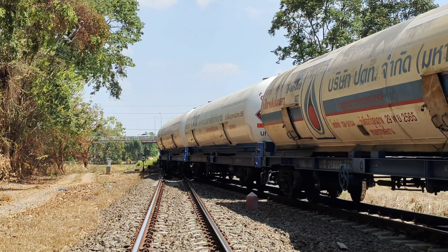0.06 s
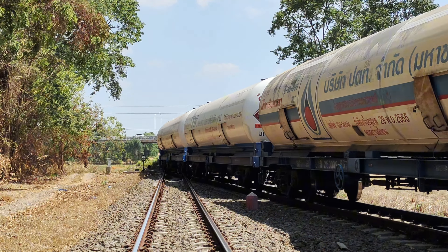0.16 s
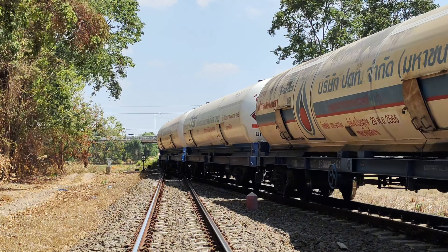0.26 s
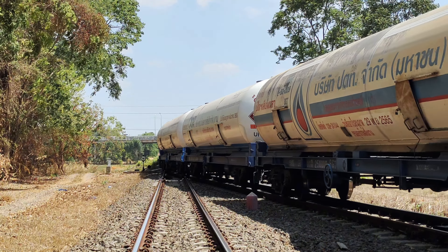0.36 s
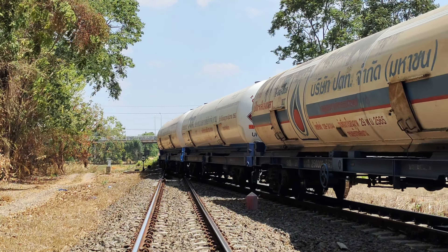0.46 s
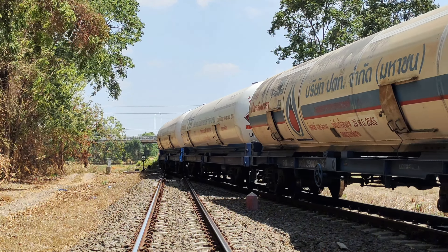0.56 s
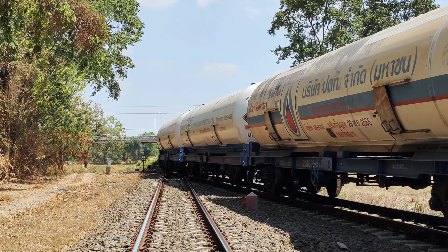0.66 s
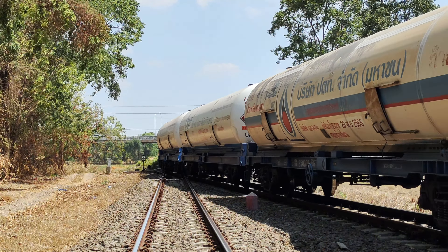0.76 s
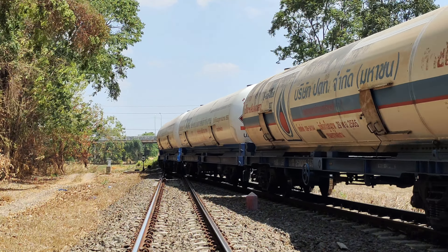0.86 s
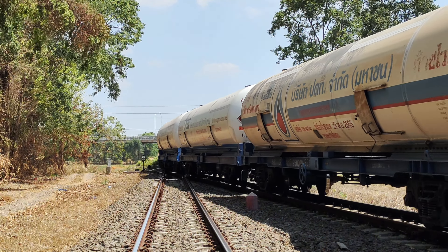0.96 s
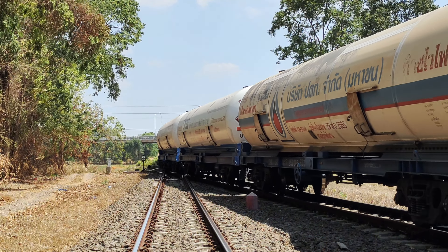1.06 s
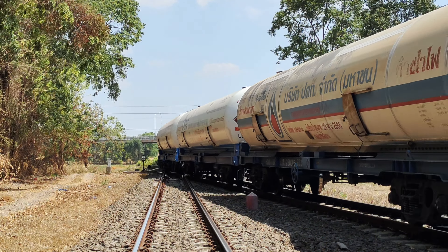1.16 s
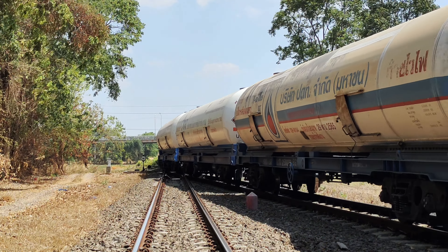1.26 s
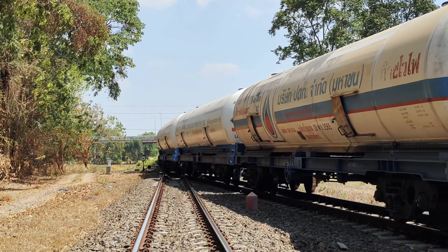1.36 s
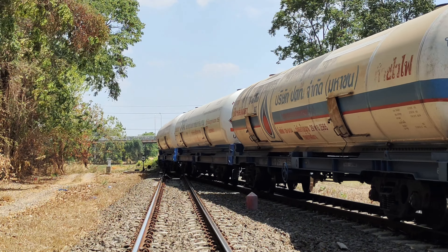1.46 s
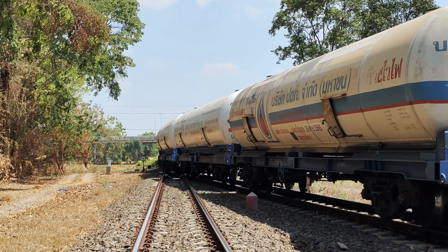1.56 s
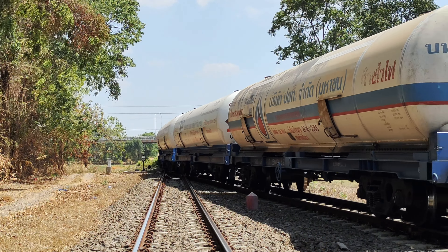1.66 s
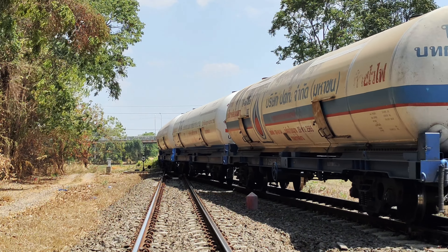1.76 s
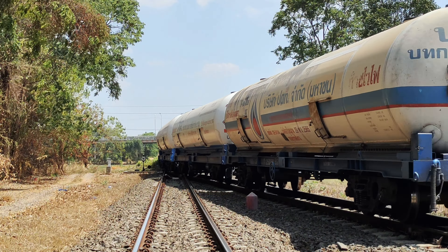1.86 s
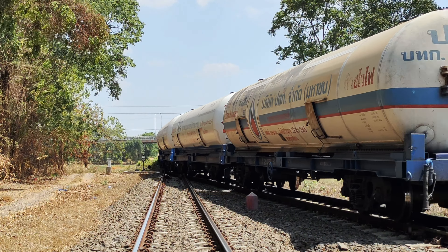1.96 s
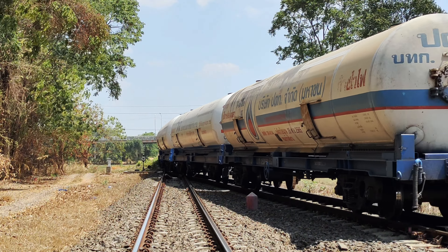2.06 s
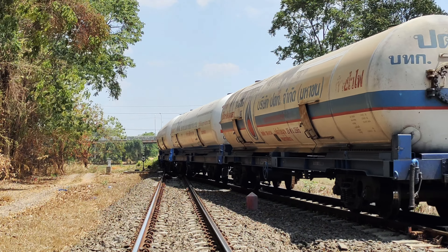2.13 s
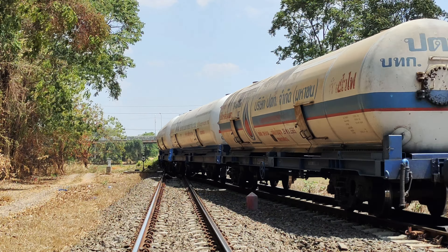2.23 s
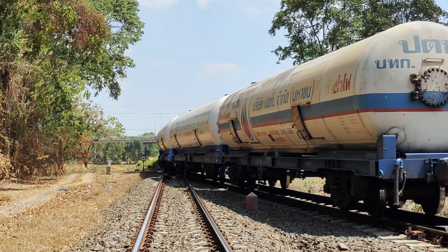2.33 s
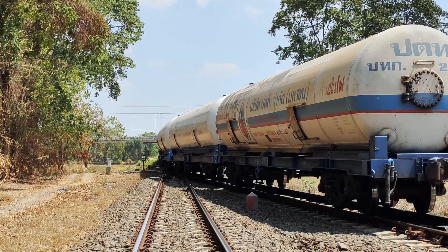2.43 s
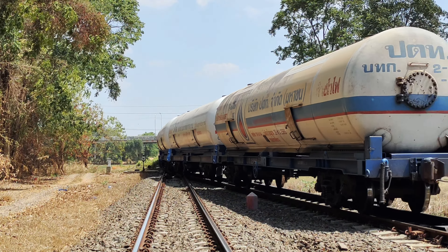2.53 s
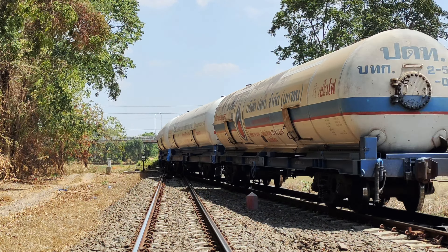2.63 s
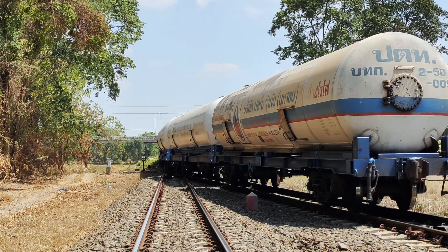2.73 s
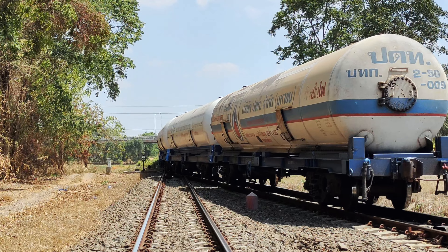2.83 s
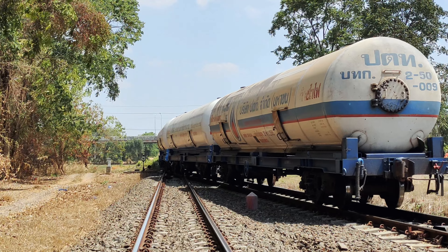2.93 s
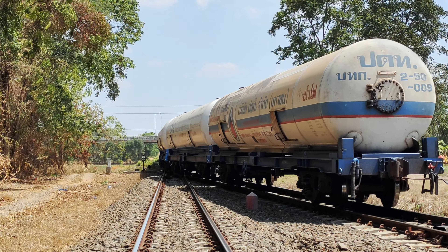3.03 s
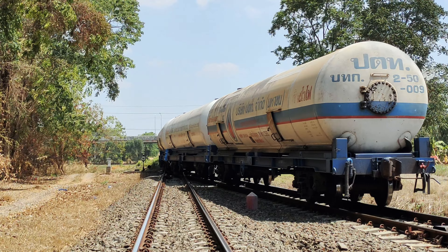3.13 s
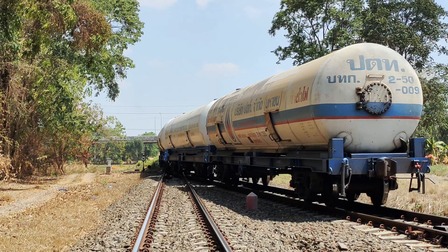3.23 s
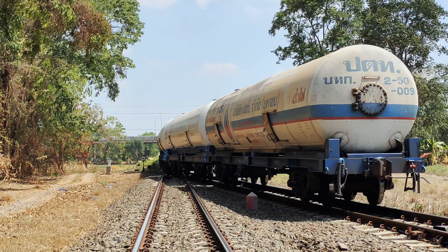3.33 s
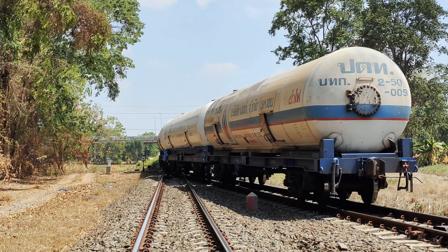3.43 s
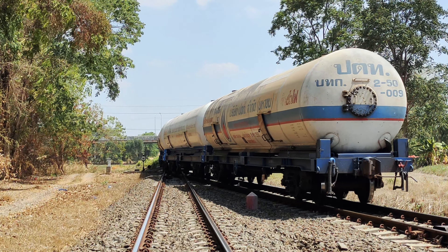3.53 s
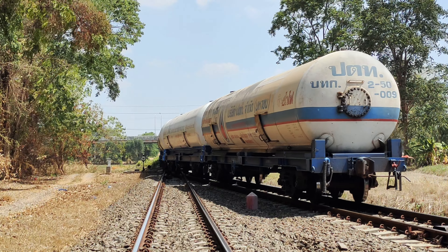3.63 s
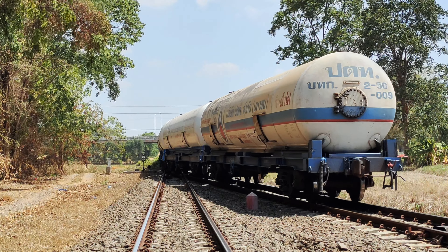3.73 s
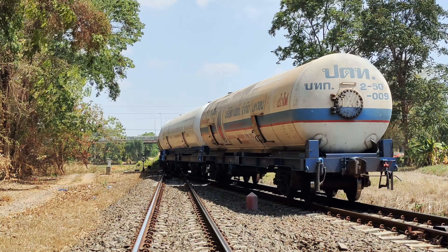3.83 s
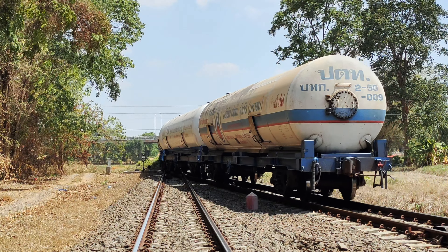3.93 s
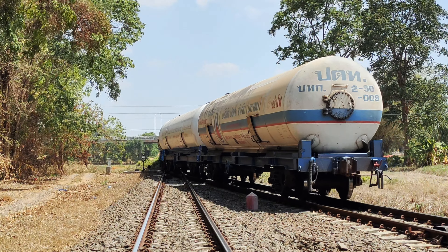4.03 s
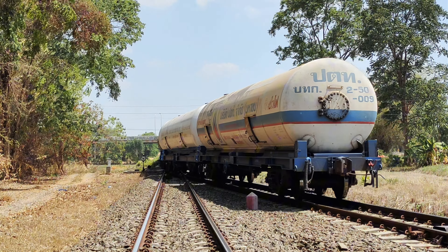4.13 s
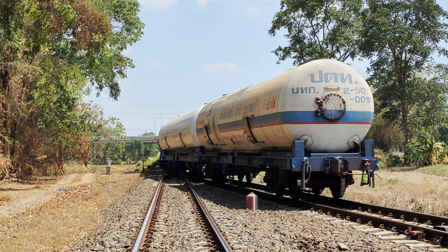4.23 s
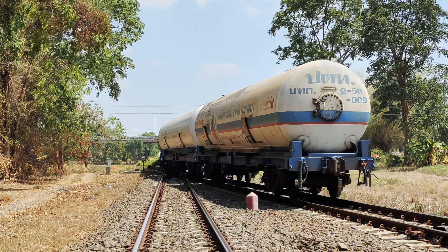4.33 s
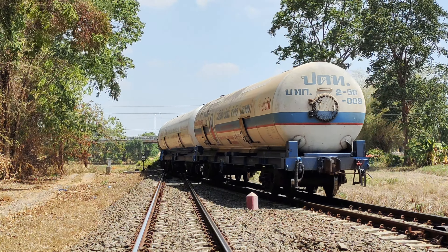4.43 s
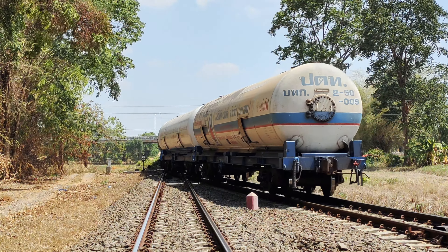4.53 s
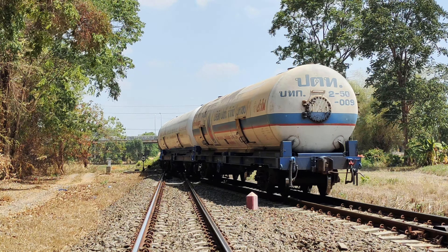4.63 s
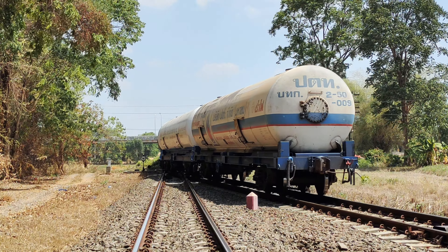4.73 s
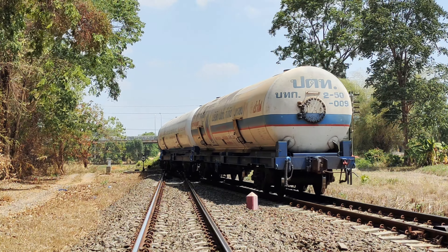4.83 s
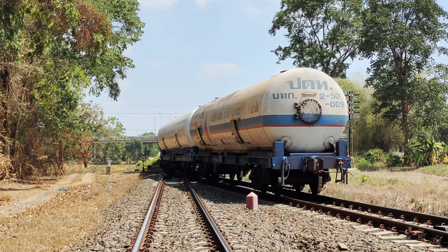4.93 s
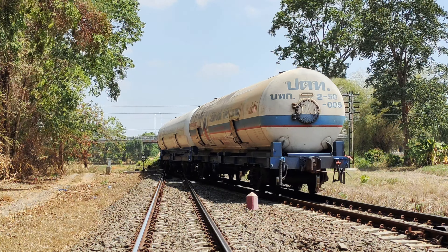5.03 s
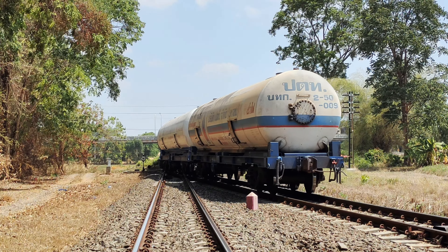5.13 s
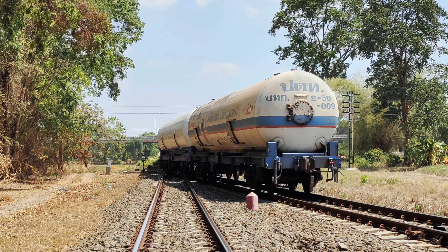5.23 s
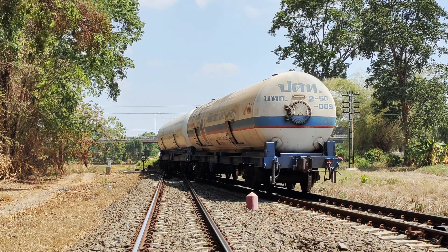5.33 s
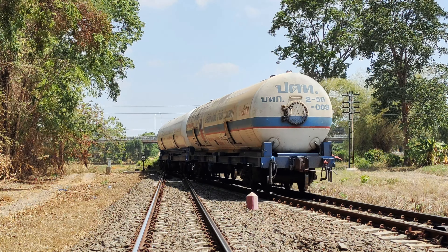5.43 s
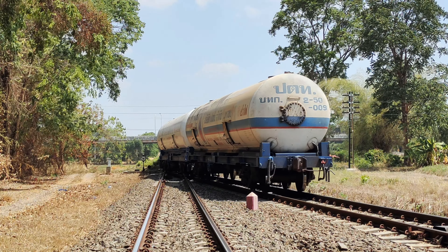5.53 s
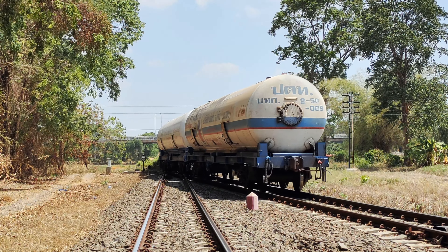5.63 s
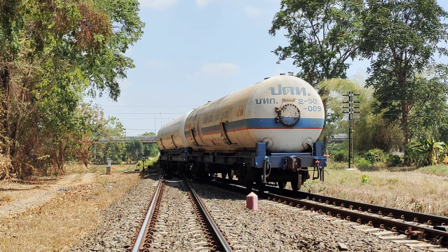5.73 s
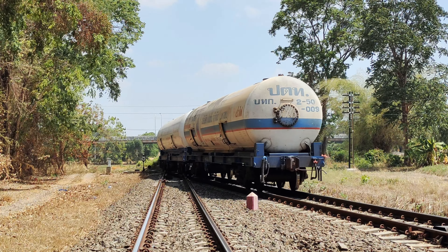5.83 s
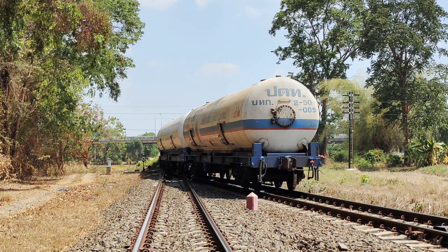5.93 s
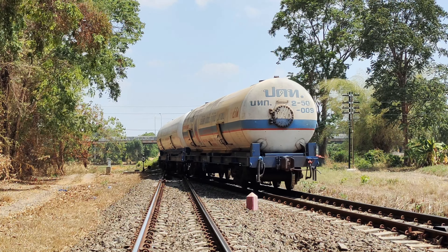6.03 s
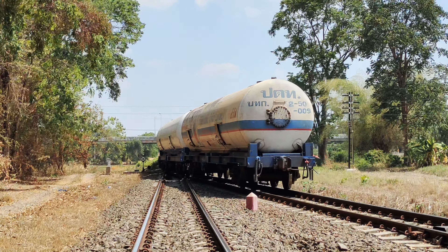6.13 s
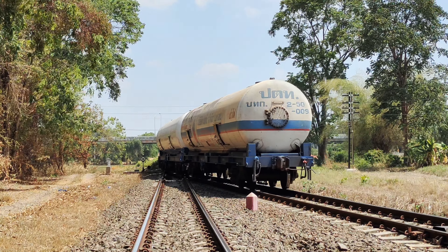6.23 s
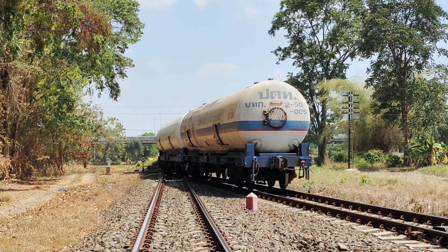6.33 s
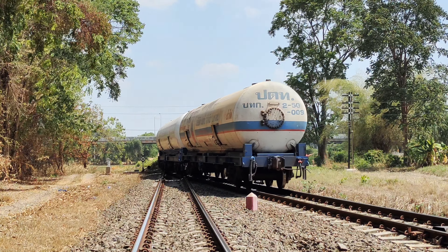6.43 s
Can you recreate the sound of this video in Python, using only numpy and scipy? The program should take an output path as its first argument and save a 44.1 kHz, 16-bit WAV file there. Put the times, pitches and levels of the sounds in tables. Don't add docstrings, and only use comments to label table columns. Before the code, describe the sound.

A slow freight train of tank wagons rolls away round a curve in an open yard. Shrill flange squeals ring at once over low rumble, in short wavering bursts with a raspy metal scrape. Between one and three seconds frames groan, axles clatter and couplings bump. The squeal thins, leaving hum and faint hiss, then bites again as wind puffs hit the nearby stereo microphone.

```python
import sys
import numpy as np
from scipy import signal
from scipy.io import wavfile
from scipy.ndimage import uniform_filter1d

SR = 44100
rng = np.random.default_rng(int(sys.argv[2]) if len(sys.argv) > 2 else 0)


def dump_mix(stems):
    frames = np.atleast_2d(stems).T
    limited = np.clip(frames, -1, 1)
    pcm = np.round(limited * 32767).astype(np.int16)
    wavfile.write(sys.argv[1], SR, pcm)


def field_ratio(decibels):
    return 10 ** (np.asarray(decibels, dtype=float) / 20)


N = 285768

# frequency in Hz, likeness from 0 to 1.
LIKENESS = [(60, 0.66), (130, 0.6), (290, 0.82), (640, 0.62), (1400, 0.3), (3060, 0.6), (6730, 0.15),
            (14800, 0.1)]
# frequency in Hz, left over right in dB.
TILT = [(60, 0), (110, 0), (200, 0.5), (380, -1), (690, -1), (1280, -2.5), (2360, 1), (4350, -3.5),
        (8020, 8.5), (14800, 8)]
SIDES = np.array([[.5], [-.5]])

# frequency in Hz, level in dB per Hz.
AIR_COLOUR = [(7000, -3), (8200, -5), (9600, -13), (11200, -12), (12300, -11), (13500, -11.5), (15500, -5)]
AIR_DB = -49
DUCKING = .5
# time in seconds, peak in dB, frequency in Hz, left over right in dB.
PUFFS = [(5.676, -18, 169, 25), (5.719, -21, 129.3, 26), (5.768, -17.5, 111.2, 24),
         (5.944, -15.5, 179.8, 28), (5.945, -18, 90.6, -26), (6.062, -22, 108.3, -11),
         (6.119, -16.5, 118.2, 22), (6.137, -13.5, 129.4, -30), (6.153, -14.5, 139, 19),
         (6.161, -17, 130.3, -30), (6.197, -22, 131, 24), (6.221, -22, 150.2, -26),
         (6.243, -26, 139.2, -14), (6.389, -14, 179.8, 7), (6.471, -23, 144, 15)]
# time in seconds, peak in dB, frequency in Hz.
BUMPS = [
    (0.7, -29, 83.6),
    (0.948, -29, 198),
    (1.32, -25, 67.97),
    (1.391, -22, 93.3),
    (1.758, -28, 68),
    (3.43, -17, 123),
]

# frequency in Hz, level in dB per Hz.
RUMBLE_COLOUR = [(12, -49), (20, -5.5), (40, -2), (92, 3.5), (108, -6.5), (150, -4.5), (225, -6.5),
                 (313, -28.5), (340, -12), (440, -30.5), (750, -120)]
# frequency in Hz, level in dB per Hz.
CLATTER_COLOUR = [(160, -36), (280, 4.5), (331, -11), (417, 0.5), (525, -1.5), (678, -7), (854, -6),
                  (1320, -18.5), (3000, -10), (3280, -4.5), (4300, -36), (5210, -9), (6000, -24),
                  (7800, -56), (13200, -120)]
# levels in dB of rumble, groan and clatter.
ROLL_DB = [-33.5, -38.5, -43.5]
# dB per second of rumble, groan and clatter.
RECEDE_DB_PER_S = [0.6, 0.75, 0.6951]
# start in seconds, end in seconds, extra dB of rumble, of groan and of clatter.
JOLTS = [
    (1.02, 1.12, -2, -2.5, 2.5),
    (1.3, 1.66, -3, 7.5, 1.5),
    (1.7, 1.8, 6.5, 13, 9.5),
    (1.82, 1.92, 6, 10, 11),
    (2.02, 2.1, 5.5, 11.5, 11),
    (2.15, 2.7, 1.5, 6, 1.5),
    (3.44, 3.48, 5, -2, -10),
]
JOLT_RISE_DB_PER_S, JOLT_FALL_DB_PER_S = 247, 155
# time in seconds, frequency in Hz.
GROAN_PITCH = [(0, 464.2), (1.2, 482.8), (1.32, 400), (1.55, 426.5), (1.72, 550), (1.8, 521.8), (1.87, 430),
               (2.03, 550), (2.15, 463.3), (4.1, 471.8), (5.3, 426.8), (6.48, 455)]

# frequency in Hz, width in Hz.
TANK_MODES = [(99.3, 27.2), (43.7, 19)]
# start in seconds, end in seconds, level in dB, left over right in dB.
TANK_HUMS = [
    [(2.3, 3.4, -38.5, -1), (3.4, 6.2, -34.5, -1.2)],
    [(1.4, 2.1, -45, 0), (2.9, 6.3, -40, 0)],
]
# frequency in Hz, width in Hz.
LOW_MODES = [(1362, 8), (2000, 90), (2358, 34), (2620, 90), (2890, 90), (3315, 60), (3735, 80), (3990, 40),
             (4130, 50), (4335, 55), (4712, 55)]
# start in seconds, end in seconds, level in dB, left over right in dB.
LOW_SQUEALS = [
    [(5.05, 5.4, -52.5, -5), (5.7, 5.95, -61, 1), (5.98, 6.8, -52, 7), (6.07, 6.3, -48, 8)],
    [(2.5, 5.3, -53.5, 0.5), (5.35, 5.5, -53, -3)],
    [(-.1, .6, -46, -5), (.5, .9, -45, 5), (.8, 1.25, -45, 3), (5.7, 6.8, -44.5, 0)],
    [(5.74, 6.05, -44.5, -1), (6.0, 6.32, -42, 2)],
    [(2.55, 2.8, -43, -6), (2.94, 3.08, -39, -2), (3.26, 3.36, -41, -8), (3.45, 3.62, -46, -4),
     (4.2, 4.36, -46, -5), (5.38, 5.56, -45, 1)],
    [(-.1, .2, -29.5, -7), (.4, .72, -34, 7), (.79, .9, -32.5, 12), (1.63, 1.76, -26.5, 3),
     (2.54, 3.0, -31, -9), (3.08, 3.38, -35, -6), (4.08, 4.2, -35, 9)],
    [(5.76, 6.1, -43.5, 0), (6.12, 6.24, -29, 4), (6.2, 6.33, -35.5, 4)],
    [(5.2, 5.5, -42, 9), (5.45, 5.75, -50, 7)],
    [(4.95, 5.2, -51, 3), (5.12, 5.5, -46, 7)],
    [(3.53, 3.68, -47, -3), (3.71, 3.8, -50, -3), (4.39, 4.63, -40.5, 9), (5.6, 5.72, -55, -3),
     (5.74, 5.98, -36.5, 1)],
    [(3.94, 4.15, -56, -2), (4.08, 4.42, -45.5, -8), (6.3, 6.6, -53, -14)],
]
# frequency in Hz, width in Hz.
FAINT_MODES = [(3800, 90), (3020, 73), (2070, 60)]
# start in seconds, end in seconds, level in dB, left over right in dB.
FAINT_SQUEALS = [
    [(-.1, .5, -38, 0.0078), (.55, .72, -43, 0), (.87, 1.15, -41, 0), (1.72, 1.9, -41.5, 0.0071),
     (2.58, 2.9, -47, 0.0085), (3.82, 4.05, -47, 0.0038), (6.1, 6.34, -37, 0.00083)],
    [(-.1, .2, -40, 0), (.25, .5, -48, 0.0081), (.97, 1.15, -40, 0), (1.18, 1.52, -36.5, 0),
     (6.25, 6.4, -47, 0)],
    [(5.576, 5.8, -59, 0.0033)],
]
# frequency in Hz, width in Hz.
HIGH_MODES = [(6470, 40), (6600, 60), (6748, 20), (7190, 80), (7460, 130), (10850, 80)]
# start in seconds, end in seconds, level in dB, left over right in dB.
HIGH_SQUEALS = [
    [(-0.04, 0.031, -25, 16)],
    [(.805, .89, -33.5, 6), (0.66, .7, -51, -16)],
    [(2.5, 2.72, -44, -16), (3.02, 3.14, -37, 7), (3.2, 3.3, -46, -2), (3.38, 3.66, -53, 19),
     (4.04, 4.21, -57, 17), (4.95, 5.35, -72, -8), (5.66, 5.74, -64, 3), (6.139, 6.25, -34.5, -23.5)],
    [(.6, .8, -46, -11), (4.59, 5.3, -51, -20)],
    [(6.088, 6.355, -46.5, -21)],
    [(4.59, 5.306, -67, 9)],
]

# start in seconds, end in seconds, scrape in dB, overtone bands in dB above the scrape.
GRIPS = [(0, 0.693, -37, -6.5), (0.816, 1.362, -39.5, -5.5), (1.363, 1.554, -41, -4.5),
         (1.69, 2.101, -43.5, -2.5), (2.12, 2.463, -47, -0.5), (2.554, 3.272, -44, -5),
         (3.45, 3.627, -47.5, -3.5), (3.698, 3.953, -59, -23), (4.04, 4.554, -81.5, -18),
         (4.597, 5.354, -66, -29), (5.43, 5.732, -47, -9.5), (5.772, 6.29, -39, -9), (6.312, 6.5, -42, -13)]
GRIP_RISE_DB_PER_S, GRIP_FALL_DB_PER_S = 303, 91
# frequency in Hz, width in Hz, dB at full grip, left over right in dB, dB gained per dB of scrape.
GRIP_MODES = [(2810, 48, -44.5, -1, 1.5), (6200, 160, -40, -0.5, 1.35), (6470, 140.7, -43, -9.5, 0.8),
              (10400, 390, -62, 8.5, 3), (13100, 1300, -59, 3, 3)]
FULL_GRIP_DB = -40
# frequency in Hz, level in dB per Hz.
SCRAPE_LOW = [(1410, 3), (2400, 1.5), (3010, -24.5), (3130, 4), (3310, -1), (3510, 5.5), (3780, 2),
              (4270, -31), (5180, -2), (5860, -23.5), (6220, -25), (6600, 1.5), (7460, -68.5), (7650, -43),
              (7800, -83.5), (10100, -111), (17200, -120)]
# frequency in Hz, level in dB per Hz.
SCRAPE_TOP = [(4710, -58), (8000, -35), (8200, -51.5), (8650, -23), (9300, 1.5), (9900, 18), (10600, -17),
              (11300, -61.5), (12300, 5), (13200, 0.5), (13800, 4), (15200, -5)]
# low edge in Hz, high edge in Hz, depth in dB.
VALLEYS = [(4240, 4600, 0), (7610, 8490, 21), (10670, 11720, 10.5)]

# start in seconds, end in seconds, level in dB, frequency in Hz.
SIDE_SPELLS = [
    [(0, .2, -16, 3388), (.24, .42, -13, 3394), (.47, .64, -14, 3400), (.87, 1.06, -16.5, 3397),
     (1.1, 1.2, -16.5, 3361), (1.24, 1.34, -11.5, 3365), (1.36, 1.58, -18.5, 3398),
     (1.75, 2.0, -21.5, 3404), (2.03, 2.45, -21.5, 3379), (2.6, 3.0, -21.5, 3390), (3.05, 3.36, -19, 3373),
     (3.46, 3.6, -23.5, 3375), (3.7, 3.97, -28, 3345), (4.1, 4.2, -24.5, 3365), (4.72, 4.95, -40, 3420),
     (5.1, 5.32, -32, 3410), (5.8, 6.0, -22, 3386), (6.02, 6.2, -25, 3410), (6.23, 6.33, -23, 3400),
     (6.35, 6.5, -26.5, 3380)],
    [(0, .3, -22.5, 3547), (.33, .55, -21.5, 3565), (.57, .8, -24, 3576), (.86, 1.2, -36, 3600),
     (1.25, 1.35, -42, 3570), (1.4, 2.0, -54, 3540), (2.6, 3.1, -36, 3464), (3.13, 3.38, -36.5, 3597),
     (3.46, 3.6, -31, 3545), (3.65, 3.95, -34, 3470), (4.68, 4.95, -28.5, 3587), (4.97, 5.06, -36, 3570),
     (5.07, 5.3, -24, 3573), (5.33, 5.55, -41, 3570), (5.78, 6.05, -32, 3540), (6.08, 6.33, -22.5, 3556),
     (6.35, 6.5, -34, 3580)],
]
# start in seconds, end in seconds, level in dB, frequency in Hz, octave overtone in dB.
LEAD_LOCKS = [(0, 0.133, -30.5, 3283, -49), (0.169, 0.333, -31.5, 3258, -49),
              (0.364, 0.502, -22, 3232, -41), (0.499, 0.58, -23, 3205, -43),
              (0.635, 0.69, -21, 3220, -42.5), (0.82, 0.928, -24.5, 3236, -38),
              (0.958, 1.048, -36, 3320, -40.5), (1.07, 1.121, -22.5, 3237, -41.5),
              (1.152, 1.237, -26.5, 3222, -46), (1.335, 1.464, -20, 3184, -37.5),
              (1.498, 1.608, -25.5, 3177, -40.5), (1.766, 1.873, -22, 3180, -40),
              (1.898, 2.036, -22, 3183, -40.5), (2.047, 2.207, -22.5, 3176, -40.5),
              (2.218, 2.364, -23.5, 3196, -37), (2.379, 2.493, -22, 3164, -39.5),
              (2.575, 2.66, -29, 3220, -42), (2.7, 2.79, -29, 3215, -42.5),
              (2.812, 3.019, -27.5, 3212, -42.5), (3.056, 3.11, -33, 3235, -45),
              (3.14, 3.2, -28, 3230, -45), (3.24, 3.345, -31.5, 3230, -45.5),
              (3.447, 3.644, -28.5, 3184, -42.5), (3.715, 3.756, -35.5, 3210, -55),
              (3.781, 3.799, -30, 3225, -49), (3.84, 3.942, -38.5, 3215, -65),
              (4.064, 4.083, -25, 3220, -39.5), (4.223, 4.359, -32.5, 3208, -49.5),
              (4.409, 4.479, -24, 3204, -46), (4.486, 4.603, -35.5, 3222, -43.5),
              (4.626, 4.95, -42, 3225, -70), (5.1, 5.19, -41, 3190, -69), (5.219, 5.361, -34.5, 3172, -55),
              (5.407, 5.751, -34, 3198, -49), (5.77, 5.83, -27.5, 3198, -38),
              (5.846, 6.0, -24.5, 3193, -37), (6.035, 6.092, -22, 3196, -40),
              (6.109, 6.301, -29, 3212, -58)]
LOCK_RISE_DB_PER_S, LOCK_FALL_DB_PER_S, OCTAVE_FALL_DB_PER_S = 551, 260, 87
SAG_HZ, SAG_S = 18.0, .1
OVERTONE_STEADY = .35
HARD_LOCK_DB, THINNING = -38, .6
# time in seconds, left over right in dB.
WHEEL_PAN = [(0.0, 3.0), (1.33, -0.5), (1.57, -5.5), (1.64, -2), (1.93, -5), (1.97, 6.5), (2.11, -2.5),
             (2.52, -1), (2.67, 6.5), (2.76, -3.0), (3.74, -0.5), (5.45, -1.5), (5.58, 11), (5.61, 2),
             (6.39, -3), (6.48, 2)]

# frequency in Hz, distance in dB.
MASK_UNDER = [(3500, 40), (3900, 24), (4400, 20), (4800, 24), (5200, 30), (7000, 26), (7600, 18),
              (8600, 18), (9600, 23), (11200, 15), (12500, 24), (15000, 24)]
MASK_DB_PER_OCTAVE, MASK_BINS, MASK_WOBBLE_DB = 20.5, 12, 2.5
# frequency in Hz, distance in dB.
LINE_UNDER = [(3300, 30), (3800, 5), (4700, 6), (6500, 9), (7400, 2), (12000, 0), (15000, -1)]


def rms_one(x):
    return x / np.sqrt(np.mean(np.abs(x) ** 2) + 1e-20)


def in_time(rows):
    s, *columns = np.transpose(rows)
    return [np.interp(np.arange(N) / SR, s, c) for c in columns]


def at_hz(points, hz):
    table = np.array(points)
    return np.interp(np.log(hz), np.log(table[:, 0]), table[:, 1])


def drift(rate, size=N):
    r = np.exp(-80 * np.pi * rate / SR)
    noise = rng.standard_normal(size // 40 + 2002)
    slow = signal.lfilter([1], [1, -2 * r, r * r], noise)[2000:]
    return np.interp(np.arange(size) / 40, np.arange(len(slow)), rms_one(slow))


def pair(mid, side, alike):
    alike = np.clip(alike, 0, 1)
    return np.sqrt((1 + alike) / 2) * mid + np.sqrt((1 - alike) * 2) * side * SIDES


def slip_tone(hz, width_hz, steady, alike, tremble=.3):
    size = len(hz)
    cycles = np.cumsum(hz + tremble * width_hz * drift(width_hz, size=size)) / SR
    wander = [drift(width_hz, size=size) + 1j * drift(width_hz, size=size) for _ in range(2)]
    steady = np.clip(steady, 0, 1)
    shape = np.sqrt(2 * steady) + np.sqrt(1 - steady) * pair(*wander, alike)
    return np.real(shape * np.exp(2j * np.pi * cycles))


def banded_noise(spectrum, step, patchy_db, alike_scale):
    lowest, highest = spectrum[0][0], spectrum[-1][0]
    count = int(np.log2(highest / lowest) / step)
    edges = np.geomspace(lowest, highest, count + 1)
    out, together, white = 0, drift(19.6), rng.standard_normal((2, 2, N))
    for k, (low, high) in enumerate(zip(edges, edges[1:])):
        band = signal.butter(2, [low, high], "band", fs=SR, output="sos")
        mid, side = signal.sosfilt(band, white[k % 2])
        hz = np.sqrt(low * high)
        flicker_db = patchy_db * (0.35 * together + drift(6.9))
        gain = field_ratio(at_hz(spectrum, hz) + flicker_db) * field_ratio(at_hz(TILT, hz) * SIDES)
        out = out + gain * pair(mid, side, alike_scale * at_hz(LIKENESS, hz))
    return rms_one(out)


def spells(rows, column, rise_db_per_s, fall_db_per_s, floor_db):
    t, table = np.arange(0, N + 40, 40) / SR, np.array(rows)
    early = np.maximum(table[:, :1] - t, 0)
    late = np.maximum(t - table[:, 1:2], 0)
    db = table[:, [column]] - rise_db_per_s * early - fall_db_per_s * late
    return np.interp(np.arange(N) / SR, t, np.maximum(db.max(axis=0), floor_db))


def scrape_level():
    return spells(GRIPS, 2, GRIP_RISE_DB_PER_S, GRIP_FALL_DB_PER_S, floor_db=-52.5)


def far_hiss():
    scrape_db = uniform_filter1d(scrape_level(), size=22000)
    level_db = AIR_DB - 2.5 - DUCKING * (np.clip(scrape_db, -55, -45) + 60.5)
    return field_ratio(level_db) * banded_noise(AIR_COLOUR, step=.13, patchy_db=2.5, alike_scale=0.85)


def wind():
    out, t = np.zeros((2, N)), np.arange(N) / SR
    for s, peak_db, hz, pan_db in PUFFS:
        near = slice(round((s - .03) * SR), round((s + .03) * SR))
        cycles = hz * (t[near] - s)
        puff = np.exp(-(cycles / 0.58) ** 2) * np.sin(2 * np.pi * cycles)
        louder_side = field_ratio(np.minimum(2 * pan_db * SIDES, 0))
        out[:, near] += field_ratio(peak_db) * louder_side * puff
    return out


def bumps():
    out, t = np.zeros(N), np.arange(round(.2 * SR)) / SR
    for s, peak_db, hz in BUMPS:
        a = round(s * SR)
        onset = 1 - np.exp(-t / 0.0017)
        decay = field_ratio(peak_db + 3.0 - 60 * t / 0.15)
        out[a:a + len(t)] += onset * decay * np.sin(2 * np.pi * hz * t)
    return out


def wagons():
    t, (groan_hz,) = np.arange(N) / SR, in_time(GROAN_PITCH)
    levels_db = []
    for k in range(3):
        jolt_db = spells(JOLTS, 2 + k, JOLT_RISE_DB_PER_S, JOLT_FALL_DB_PER_S, floor_db=0)
        levels_db.append(ROLL_DB[k] - RECEDE_DB_PER_S[k] * t + jolt_db)
    rumble_db, groan_db, clatter_db = levels_db
    rumble = banded_noise(RUMBLE_COLOUR[1:-2], step=.4, patchy_db=-1.07, alike_scale=.9)
    groan = slip_tone(groan_hz, width_hz=56.2, steady=0.0039, alike=1.0)
    clatter = banded_noise(CLATTER_COLOUR[1:-2], step=.3, patchy_db=1.5, alike_scale=0.44)
    rolling = field_ratio(rumble_db + 0.9) * rumble + field_ratio(groan_db - 0.5 - 2.2 * SIDES) * groan
    return rolling + field_ratio(clatter_db + 9.5) * clatter


def passing_squeals():
    out = np.zeros((2, N))
    modes = LOW_MODES + FAINT_MODES + HIGH_MODES + TANK_MODES
    times = LOW_SQUEALS + FAINT_SQUEALS + HIGH_SQUEALS + TANK_HUMS
    for (hz, width_hz), rows in zip(modes, times):
        for start, end, level_db, pan_db in rows:
            a, b = round(max(start, 0) * SR), min(round(end * SR), N)
            part = (np.arange(a, b) / SR - start) / (end - start)
            swell = np.clip(part / 0.2, 0, 1) * np.clip((1 - part) / 0.32, 0, 1)
            flutter = field_ratio(level_db + pan_db * SIDES + 2.2 * drift(11.3, size=b - a))
            wavering_hz = hz + 0.1487 * width_hz * drift(2.83, size=b - a)
            out[:, a:b] += swell * flutter * slip_tone(wavering_hz, width_hz / 2, steady=0.016, alike=0.99)
    return out


def grip_modes():
    out, over_db = 0, scrape_level() - FULL_GRIP_DB
    for hz, width_hz, level_db, pan_db, follows in GRIP_MODES:
        flutter = field_ratio(level_db + follows * over_db + pan_db * SIDES + 4.24 * drift(2.4))
        out = out + flutter * slip_tone(np.full(N, hz), width_hz / 2, steady=0.04, alike=0.24)
    return out


def flange_scrape(grip_db):
    top_db, = in_time([(s, row[3]) for row in GRIPS for s in row[:2]])
    low = field_ratio(10.5) * banded_noise(SCRAPE_LOW[1:-2], step=.15, patchy_db=2.0, alike_scale=0.53)
    top = field_ratio(top_db - 2.0) * banded_noise(SCRAPE_TOP[1:], step=.11, patchy_db=2.0, alike_scale=0.61)
    return field_ratio(scrape_level() + 0.17 * grip_db) * (low + top)


def side_modes(grip_db):
    out = 0
    for rows in SIDE_SPELLS:
        level_db = spells(rows, 2, LOCK_RISE_DB_PER_S, LOCK_FALL_DB_PER_S, floor_db=-48)
        hz, = in_time([(s, row[3]) for row in rows for s in row[:2]])
        pan_db = in_time(WHEEL_PAN)[0] + 2.5 + 1.3 * drift(3.8)
        tone = slip_tone(hz + 8.0 * drift(29.8), width_hz=34.0, steady=.45, alike=0.56)
        out = out + field_ratio(level_db + pan_db * SIDES) * tone
    return out * field_ratio(grip_db - 9.0)


def lead_wheel(grip_db):
    pitch = []
    for start, end, _, hz, _ in LEAD_LOCKS:
        pitch += [(start, hz + SAG_HZ), (min(start + SAG_S, end - .01), hz), (end, hz)]
    hz, = in_time(pitch)
    hz = hz + 11.0 * drift(40.0)
    level_db = spells(LEAD_LOCKS, 2, LOCK_RISE_DB_PER_S, LOCK_FALL_DB_PER_S, floor_db=-49)
    octave_db = spells(LEAD_LOCKS, 4, LOCK_RISE_DB_PER_S, OCTAVE_FALL_DB_PER_S, floor_db=-71)
    high_db = octave_db + THINNING * np.minimum(octave_db - HARD_LOCK_DB, 0)
    pan_db = in_time(WHEEL_PAN)[0] + 0.88 * drift(5.5)
    main = slip_tone(hz, width_hz=34.4, steady=.62, alike=0.54, tremble=0)
    octave = slip_tone(2 * hz, width_hz=46, steady=OVERTONE_STEADY, alike=0.12, tremble=0)
    third = slip_tone(3 * hz, width_hz=40, steady=OVERTONE_STEADY, alike=0.21, tremble=0)
    fourth = slip_tone(4 * hz, width_hz=70, steady=OVERTONE_STEADY, alike=.3, tremble=0)
    tone = field_ratio(level_db + 2.0) * main + field_ratio(octave_db + 5.0) * octave
    tone += field_ratio(high_db - 12) * third + field_ratio(high_db - 19 + 4.0 * SIDES) * fourth
    return tone * field_ratio(grip_db + pan_db * SIDES)


def scene():
    grip_db = 0.5 * drift(1.8)
    wheels = wagons() + flange_scrape(grip_db) + side_modes(grip_db) + lead_wheel(grip_db)
    for *valley, depth_db in VALLEYS:
        notch = signal.cheby2(4, depth_db, valley, "bandstop", fs=SR, output="sos")
        wheels = signal.sosfilt(notch, wheels)
    return far_hiss() + wind() + bumps() + passing_squeals() + grip_modes() + wheels


def masking(x):
    hz, _, z = signal.stft(x, SR, nperseg=2048)
    count = len(hz) // MASK_BINS
    used = count * MASK_BINS
    power = (np.abs(z[:, :used]) ** 2).reshape(2, count, MASK_BINS, -1) + 1e-20
    db = 10 * np.log10(power.sum(axis=(0, 2)))
    centre = ((np.arange(count) + .5) * MASK_BINS * hz[1])[:, None]
    slope = MASK_DB_PER_OCTAVE * np.log2(centre)
    skirt = np.maximum.accumulate(np.where(centre > 2500, db + slope, -300), axis=0) - slope
    wobble = MASK_WOBBLE_DB * (rng.standard_normal(db.shape) + rng.standard_normal(db.shape[1]))
    band_kept = np.clip(db - skirt + at_hz(MASK_UNDER, centre) + wobble, 0, 1)
    line_limit = field_ratio(-2 * at_hz(LINE_UNDER, centre))[:, None]
    line_kept = power > power.mean(axis=2, keepdims=True) * line_limit
    z[:, :used] *= (band_kept[:, None] * line_kept).reshape(2, used, -1)
    return signal.istft(z, SR, nperseg=2048)[1][:, :N]


def low_pass(x):
    return signal.sosfilt(signal.butter(12, 15380, fs=SR, output="sos"), x)


def record(dry):
    low_cut = signal.butter(3, 38.2, "high", fs=SR, output="sos")
    heard = masking(signal.sosfilt(low_cut, dry))
    return low_pass(heard)


dry = scene()
out = record(dry)
dump_mix(out)
```